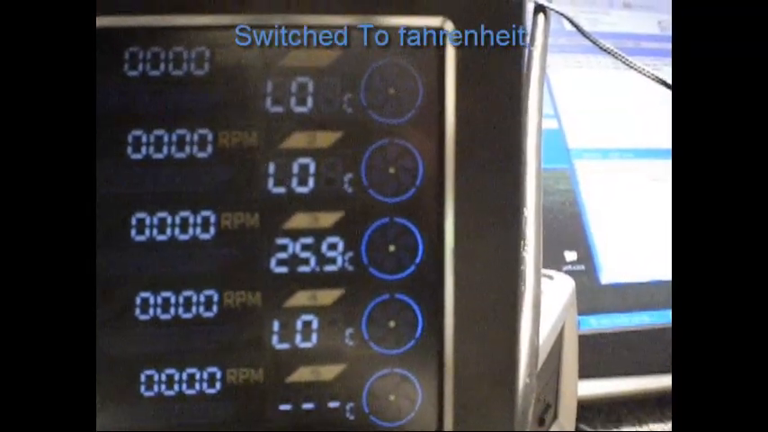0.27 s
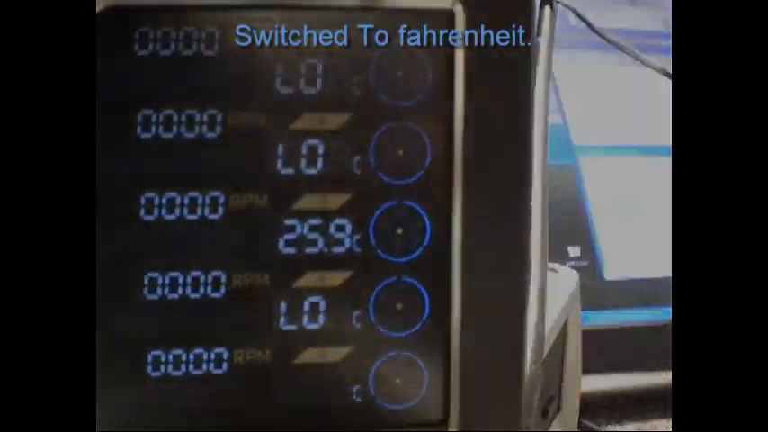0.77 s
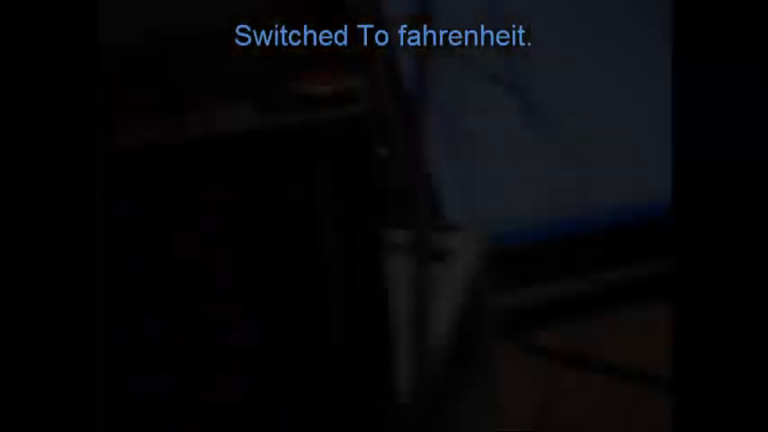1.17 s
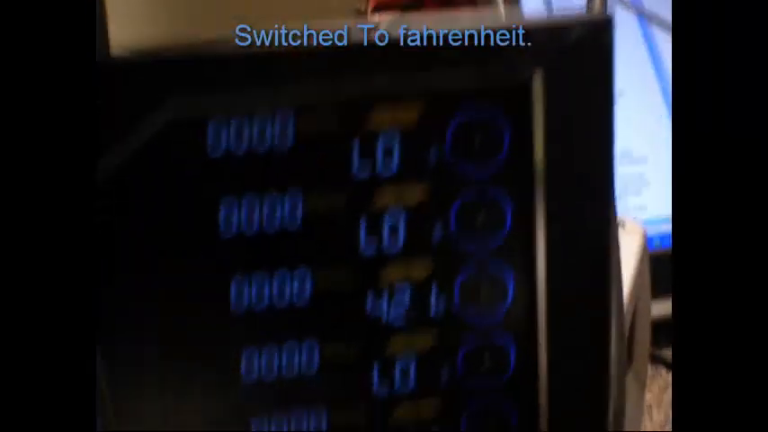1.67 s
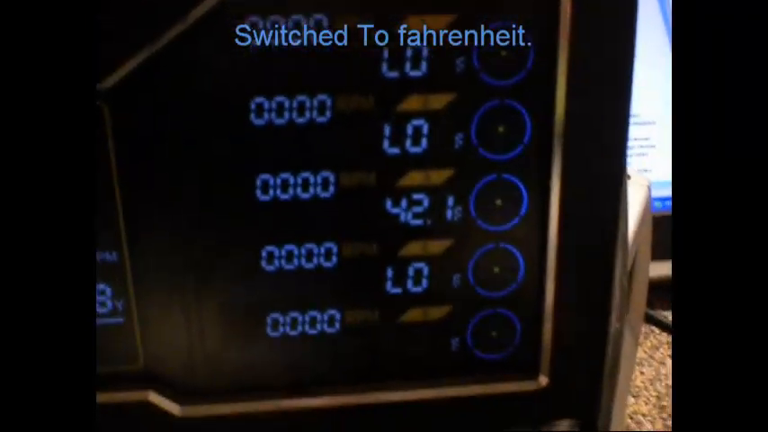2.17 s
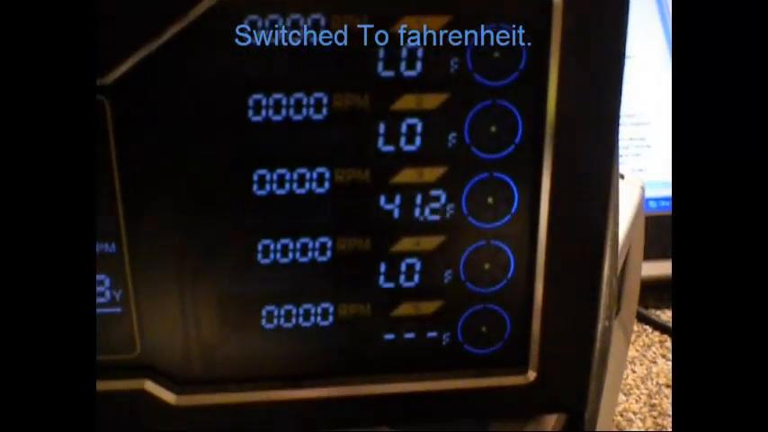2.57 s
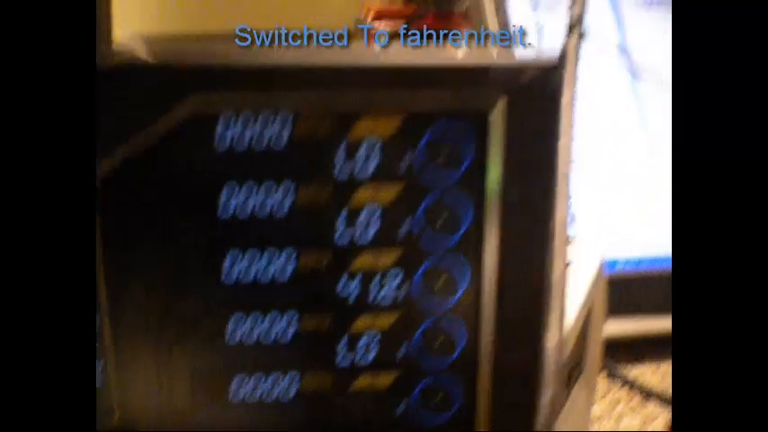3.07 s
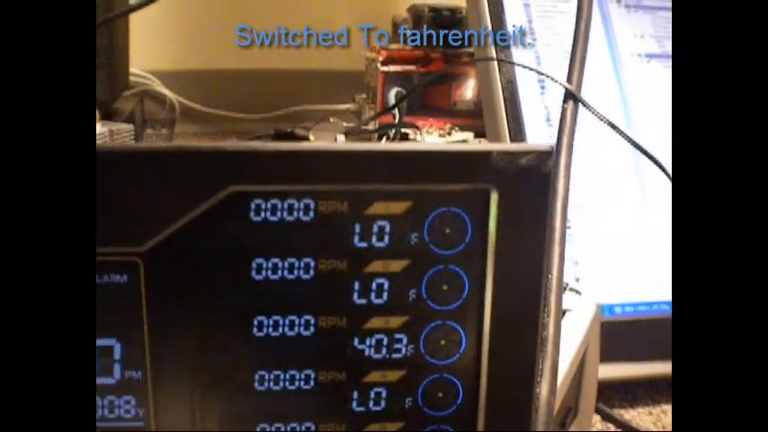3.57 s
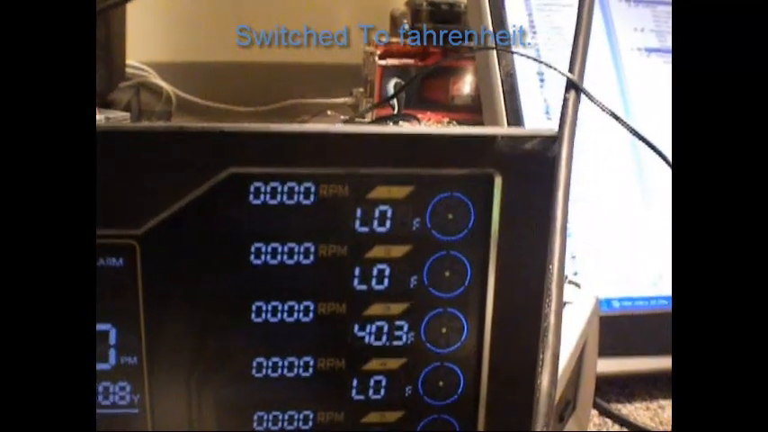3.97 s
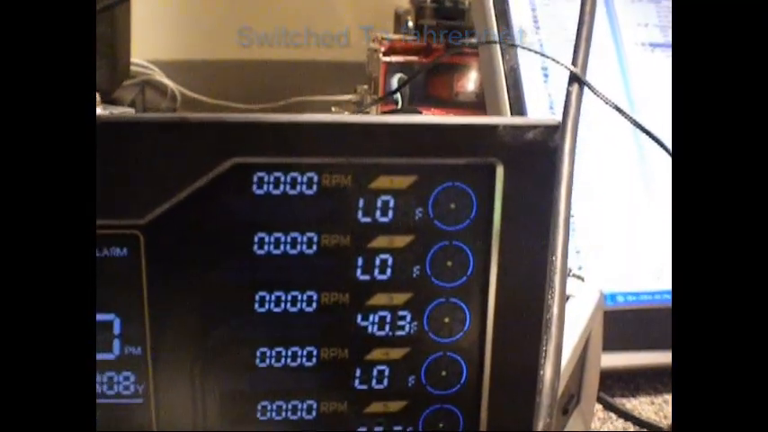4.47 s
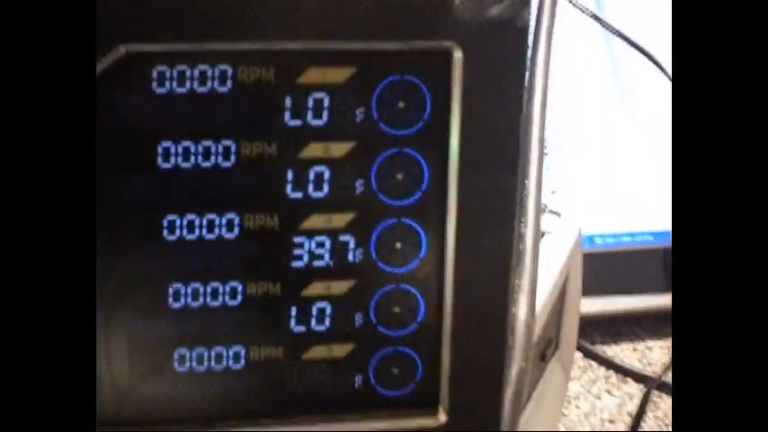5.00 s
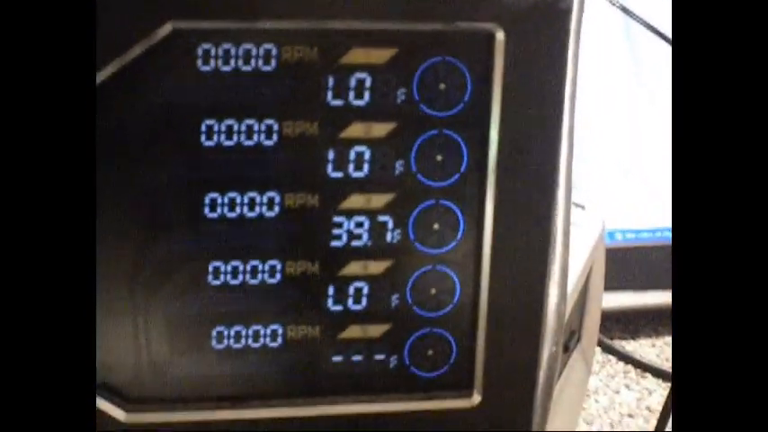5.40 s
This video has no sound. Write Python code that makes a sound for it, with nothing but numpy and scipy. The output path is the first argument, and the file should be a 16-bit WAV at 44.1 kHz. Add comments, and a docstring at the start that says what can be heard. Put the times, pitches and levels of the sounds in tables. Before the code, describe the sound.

From the start, slow computer fans make a soft, even whoosh over a faint electrical hum and low rumble, heard close to an open case indoors through a hand-held mono microphone. A barely audible plastic tick comes at about 0.6 seconds. Just before 1.2 seconds the sound cuts to silence for a split second. It returns abruptly and clearly louder, with a fast cooling fan now running on top of the slow ones. This fan brings a rush of air, a steady mid-pitched tone, an airy hiss and a thin, higher bearing whine. It grows slightly until about 1.7 seconds and then holds. The whine swells and fades several times as the microphone moves. Two faint plastic handling ticks come at about 3.3 and 3.4 seconds. The fans run on steadily until the end, at around 5.5 seconds.

```python
"""First you hear slow fans whooshing softly over a mains hum, close to an open computer case indoors.
The sound cuts out for a moment and returns with a fast seven-blade cooler fan running too.
Its blades stir up a louder rush and a steady tone, air hisses through its heat sink, and its
ball bearing gives a thin whine. The hand-held camera that carries the mono microphone ticks faintly."""
import sys
import numpy as np
from scipy import signal
from scipy.fft import rfft, irfft, next_fast_len
from scipy.io import wavfile
from scipy.ndimage import uniform_filter1d, map_coordinates

SR = 44100
rng = np.random.default_rng(int(sys.argv[2]) if len(sys.argv) > 2 else 0)


def output_pcm(signal):
    """Save a mono or channel-first signal as 16-bit PCM at the path in sys.argv[1].

    Samples are clipped to [-1, 1] before scaling.
    """
    pcm = np.clip(np.atleast_2d(signal).T, -1, 1) * 32767
    wavfile.write(sys.argv[1], SR, np.round(pcm).astype(np.int16))


N = 248724
TIME = np.arange(N) / SR
CUT_S, RESUME_S = 1.159, 1.2252  # the silent break
SHAFT_HZ, BALL_HZ = 96.43, 297.72  # cooler fan: turns a second, bearing balls passing a second

# Air churned by the cooler's blades. Each row: frequency in Hz, relative strength in dB.
RUSH_SPECTRUM = [(50, -58), (80, -32), (120, -28), (200, -15.5), (310, -11.5), (400, -3), (680, 0.5),
                 (870, 0.5), (1000, -3.5), (1130, -2.5), (1350, -8), (1650, -7), (2150, -16), (3000, -33),
                 (6000, -48)]
# Air forced through the heat sink. Each row: frequency in Hz, relative strength in dB.
HISS_SPECTRUM = [(1000, -37), (2200, -1.5), (2450, 5), (2750, 1.5), (3400, 2.5), (4000, -8.5), (4450, -2),
                 (5000, -1), (5850, -5), (6400, -3), (7300, -3), (8900, -4), (10200, -9), (10800, -8.5)]
def cooler_fan(rush_db=-30.5, hiss_db=-37.5, buzz_db=-48, near_s=1.68):
    """The fast fan pushes air and sings, growing a little louder as the microphone comes near."""
    approach_db = np.interp(TIME, [RESUME_S, near_s], [-2, 0])
    clock = TIME + np.cumsum(0.00012 * wobble(2) + 0.000303 * wobble(14)) / SR  # shaft speed wavers
    pulsing = 1 + 0.04 * np.sin(2 * np.pi * SHAFT_HZ * clock)  # the airflow swells once a turn
    eddies_db = 0.18 * wobble(14) + wobble(150)  # small swirls make the hiss flicker
    rush = amp(rush_db + approach_db) * air(RUSH_SPECTRUM, patchy_db=0.95)
    hiss = amp(hiss_db + 0.46 * approach_db + eddies_db) * air(HISS_SPECTRUM, patchy_db=0.58)
    low_rumble = rumble(level_db=-56, patchy_db=2)
    rotor = amp(approach_db) * blades(clock) + bearing(clock) + amp(buzz_db) * rotor_buzz(clock)
    return pulsing * (rush + hiss) + low_rumble + rotor + case_whistles()


# The cooler's blade and motor tones. Each row: vibrations per turn, level in dB once near.
BLADE_TONES = [(1, -74), (2, -65.5), (7, -32), (8, -43.5), (12, -45), (21, -54), (25, -59), (35, -55.5),
               (48, -57.5), (49, -53), (62, -66), (71, -60.5), (76, -52), (90, -54.5), (95, -66),
               (110, -65)]
def blades(clock):
    """Blades and motor beat in step with the shaft; seven beats a turn is the loudest tone."""
    return sum(amp(db) * tone(round(beats) * SHAFT_HZ, clock, flutter=0.058) for beats, db in BLADE_TONES)


# The microphone moves through standing waves, the loud and quiet spots of the low whine.
# Each row: time in seconds, level in dB.
LOW_WHINE_LEVELS = [(1.28, -48.0), (1.75, -35), (2.0, -36), (2.22, -46), (2.4, -37), (2.8, -48.5),
                    (3.05, -38.5), (3.35, -38.5), (4.15, -48.5), (5.45, -42.5)]
# The middle whine has its own, broader spots. Each row: time in seconds, level in dB.
MIDDLE_WHINE_LEVELS = [(1.35, -46), (1.9, -46), (2.8, -54), (3.5, -55), (4.0, -46.5), (5.5, -47)]
# Weaker bearing tones. Each row: pitch in Hz, level in dB relative to the low whine.
BEARING_SIDE_TONES = [(1392, -9), (1454, -9.5), (1584.8, -16), (6214, -19.5), (6513, -12.5), (9490, -15.5),
                      (9787, -24)]
def bearing(clock):
    """The balls whine at 5 and 6 times their passing rate, and at the sum of the two."""
    low_db = np.interp(TIME, *np.transpose(LOW_WHINE_LEVELS))
    middle_db = np.interp(TIME, *np.transpose(MIDDLE_WHINE_LEVELS))
    high_db = -49 + 0.22 * (middle_db - middle_db.mean())  # nearly steady
    whines = sum(amp(db) * tone(multiple * BALL_HZ, clock, flutter=0.16)
                 for multiple, db in [(5, low_db), (6, middle_db), (11, high_db)])
    side_tones = sum(amp(db) * tone(hz, clock, flutter=0.21) for hz, db in BEARING_SIDE_TONES)
    return whines + amp(low_db) * side_tones


def rotor_buzz(clock):
    """Small flaws of the rotor pass in the same order every turn, adding a faint buzz to the hiss."""
    flaws = rng.standard_normal(round(SR / SHAFT_HZ))
    position = clock * SHAFT_HZ % 1 * len(flaws)
    return coloured_by(map_coordinates(flaws, [position], mode="grid-wrap"), HISS_SPECTRUM)


# Air moved by the slow fans. Each row: frequency in Hz, relative strength in dB.
WHOOSH_SPECTRUM = [(40, -49), (80, -47), (115, -22), (160, -16), (230, -9), (400, -5), (560, 0),
                   (800, -9.5), (1200, -12), (1800, -15.5), (2150, -22), (3400, -21), (4000, -27.5),
                   (4450, -23.5), (5800, -29), (7200, -23.5), (11000, -32.5)]
# Their blade tones. Each row: pitch in Hz, level in dB, width of the pitch drift in Hz.
CASE_BLADE_TONES = [(288.7, -49, 3.5), (359.4, -58, 4.9), (554, -51.5, 10.24), (1155, -57.5, 12.9),
                    (2880, -65, 13), (3010, -68.5, 5.1), (5100, -69, 12.6), (6900, -85, 15)]
def case_fans(whoosh_db=-40):
    """Slow fans stir the air into a soft whoosh with blurred blade tones, over a faint rumble."""
    whoosh = amp(whoosh_db) * air(WHOOSH_SPECTRUM, patchy_db=0.4)
    return whoosh + wandering(CASE_BLADE_TONES, flutter=0.34) + rumble(level_db=-57, patchy_db=1)


# Whistles of the case. Each row: pitch in Hz, level in dB, width of the pitch drift in Hz.
WHISTLES = [(2960, -56, 3.9), (5040, -64, 3.1)]
def case_whistles():
    """The case whistles faintly at nearly steady pitches."""
    return wandering(WHISTLES, flutter=0.11)


# The deepest fan noise. Each row: frequency in Hz, relative strength in dB.
RUMBLE_SPECTRUM = [(8, 7.5), (24, -8.5), (45, -29.5), (70, -32), (150, -60)]
def rumble(level_db, patchy_db):
    """A faint, low rumble under a running fan."""
    return amp(level_db) * air(RUMBLE_SPECTRUM, patchy_db)


# Ticks of the plastic. Each row: start in seconds, level in dB.
PLASTIC_TICKS = [(0.617, -47), (3.334, -34), (3.447, -38)]
# How bright they sound. Each row: frequency in Hz, relative strength in dB.
TICK_SPECTRUM = [(800, -17), (2500, -3), (3800, 2), (6000, -6), (10500, -10), (12000, -60)]
def handling_ticks(fade_s=0.028):
    """The plastic camera body ticks in the hand; each tick drops 60 dB in fade_s."""
    bursts = sum((TIME >= start) * amp(db - 60 * np.abs(TIME - start) / fade_s)
                 for start, db in PLASTIC_TICKS)
    return bursts * air(TICK_SPECTRUM, patchy_db=7)


def mains_hum(hum_hz=120, level_db=-69, rise_db=5.5):
    """A faint, unsteady hum at twice the mains frequency, stronger after the break."""
    return amp(level_db + rise_db * (TIME >= RESUME_S)) * tone(hum_hz, TIME, flutter=0.51)


def air(spectrum, patchy_db):
    """Noise at level 1 whose frequency bands swell and dip in random patches, as in swirling air."""
    bands = signal.stft(rng.standard_normal(N), nperseg=512)[2]
    patches = uniform_filter1d(rng.standard_normal(bands.shape), size=6, axis=0)  # blur in frequency
    patches = uniform_filter1d(patches, size=12, axis=1)  # blur in time
    noise = signal.istft(bands * amp(patchy_db * unit(patches)), nperseg=512)[1][:N]
    return coloured_by(noise, spectrum)


def tone(hz, clock, flutter):
    """A tone at level 1; flutter shakes its strength and timing, as uneven airflow does to a fan."""
    shake = 1 + flutter * (wobble(35) + 1j * wobble(35))
    return unit(np.real(shake * np.exp(2j * np.pi * (hz * clock + rng.random()))))


def wandering(tones, flutter):
    """Tones that each drift around their own pitch."""
    total = np.zeros(N)
    for hz, db, width_hz in tones:
        drift_s = np.cumsum(wobble(12)) / SR * width_hz / (2 * hz)
        total += amp(db) * tone(hz, TIME + drift_s, flutter)
    return total


def wobble(rate):
    """A smooth curve through `rate` random points a second."""
    points = rng.standard_normal(1024)
    coarse = TIME[::64]
    return np.interp(TIME, coarse, map_coordinates(points, [coarse * rate + 2], mode="wrap"))


def coloured_by(x, spectrum):
    """Shape x with a spectrum table, then bring it to level 1."""
    hz, db = np.transpose(spectrum)
    return unit(filtered(x, lambda f: amp(np.interp(np.log(f + 1), np.log(hz), db))))


def filtered(x, response):
    """Multiply each frequency f in x by response(f)."""
    size = next_fast_len(N + SR // 4)
    return irfft(rfft(x, size) * response(np.fft.rfftfreq(size, 1 / SR)), size)[:N]


def amp(db):
    """Turn decibels into a multiplier."""
    return 10 ** (np.asarray(db) / 20)


def unit(x):
    """Scale to an average (rms) level of 1."""
    return x / np.sqrt(np.mean(x ** 2) + 1e-20)


def scene():
    """The case fans run throughout; the cooler fan is there after the break."""
    mono = case_fans() + mains_hum() + (TIME >= RESUME_S) * cooler_fan() + handling_ticks()
    return np.array([mono, mono])


def record(dry):
    """The mono sound loses a narrow band of treble, cuts out briefly and has no very high notes."""
    notch_hz, width_hz, depth_db, top_hz = 8000, 320, -23.5, 10870
    notched = filtered(dry[0], lambda f: amp(depth_db * np.exp(-((f - notch_hz) / width_hz) ** 2)))
    sound_on = (TIME < CUT_S) | (TIME >= RESUME_S)
    mono = filtered(notched * sound_on, lambda f: 1 / np.hypot(1, (f / top_hz) ** 400))
    return np.array([mono, mono])


dry = scene()
out = record(dry)
output_pcm(out)
```